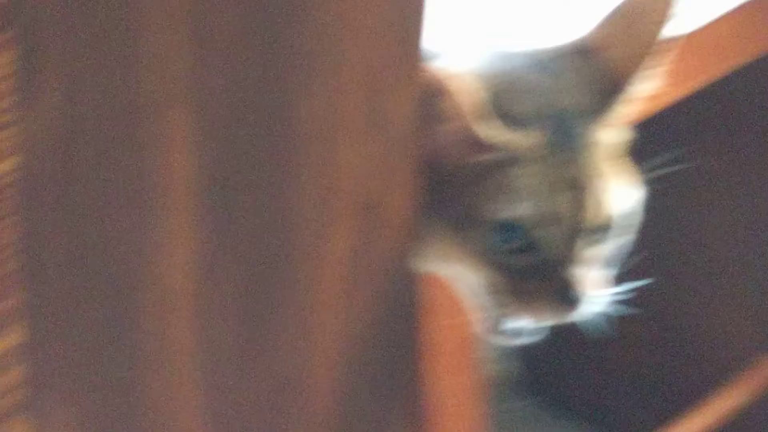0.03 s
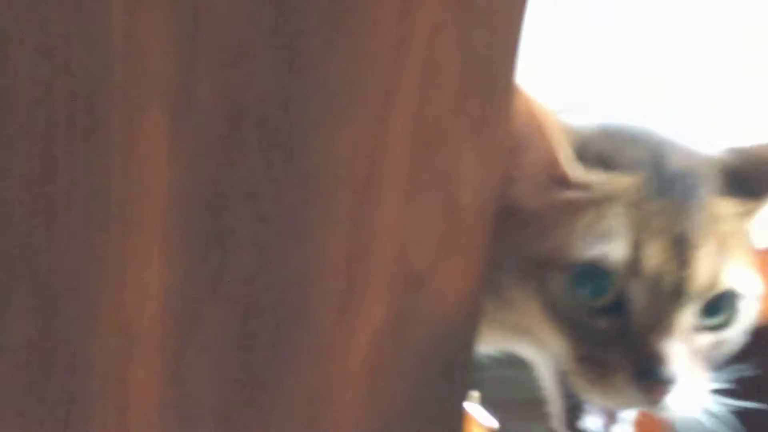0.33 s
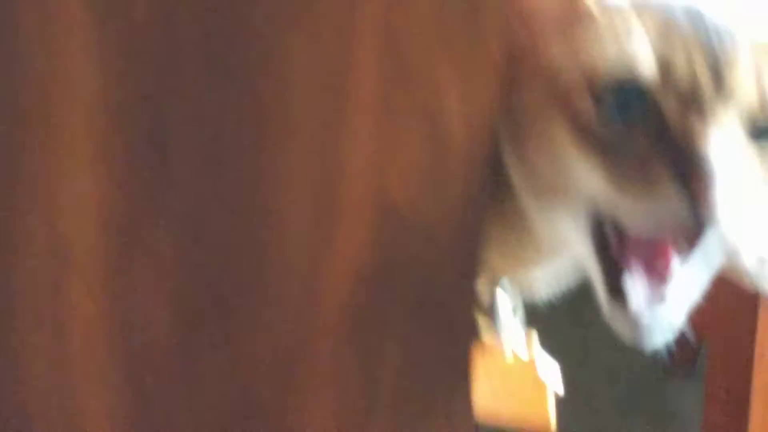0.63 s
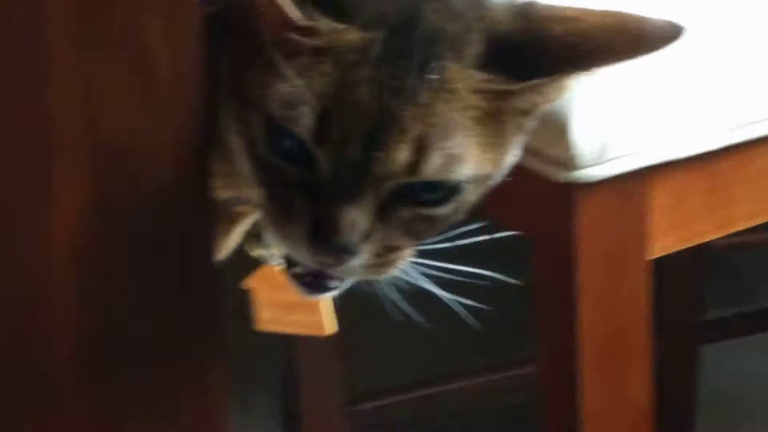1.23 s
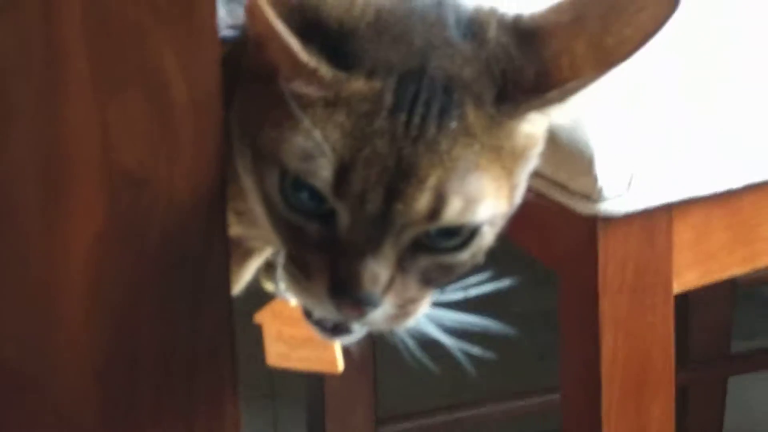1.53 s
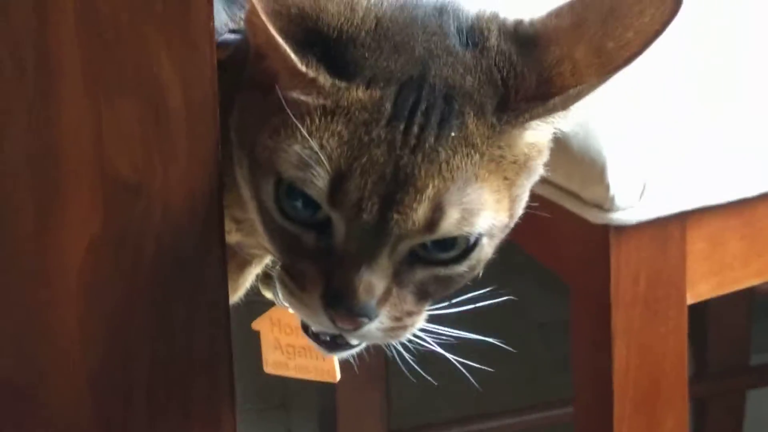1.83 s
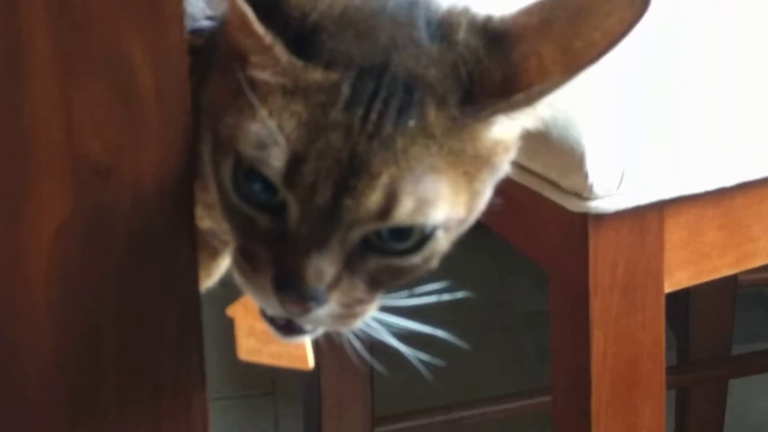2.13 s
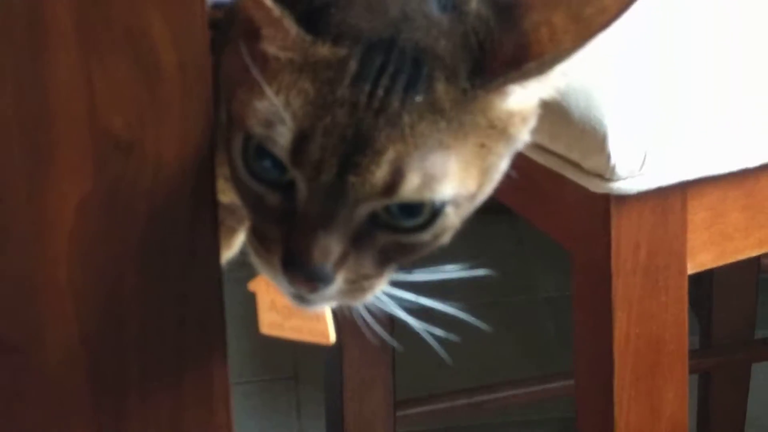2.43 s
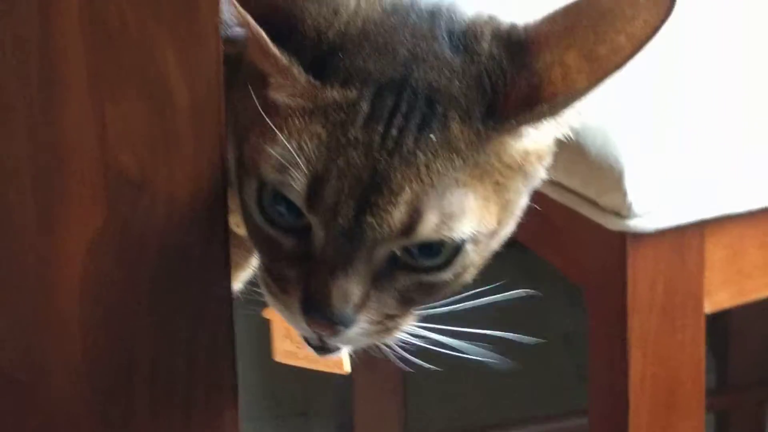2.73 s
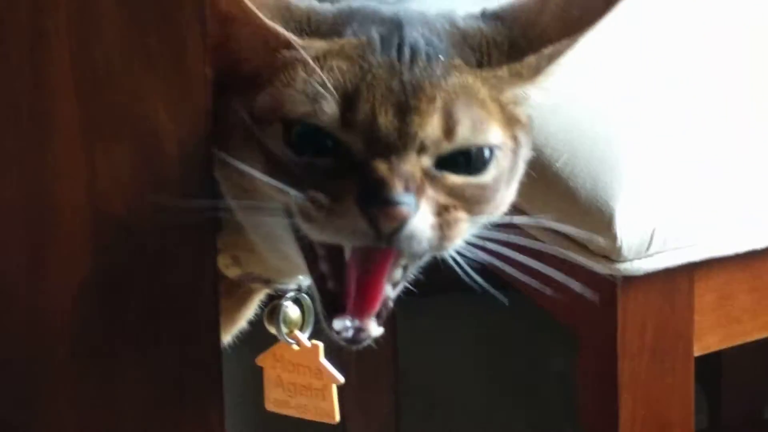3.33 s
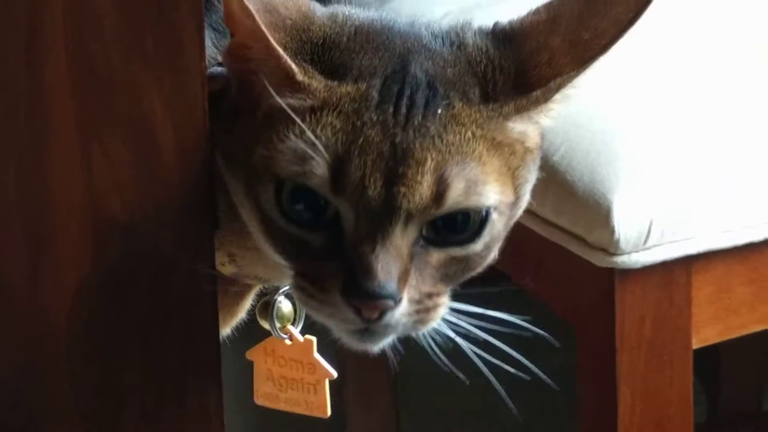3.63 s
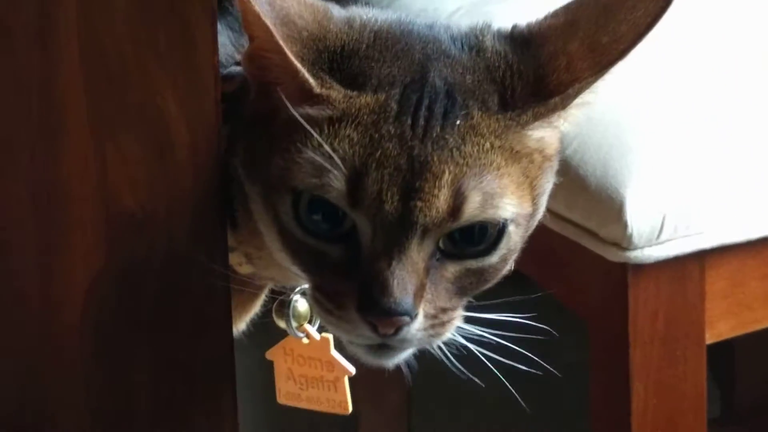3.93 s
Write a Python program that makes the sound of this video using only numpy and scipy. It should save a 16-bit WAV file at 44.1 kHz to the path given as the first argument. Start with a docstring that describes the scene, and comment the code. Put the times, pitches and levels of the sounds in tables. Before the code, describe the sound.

A cat's long growling yowl breaks into spitting and a hiss, close by indoors.

```python
"""A small room, the microphone close to a cat. Its voice holds one long growling yowl, shaped by a mouth
that opens and narrows; midway something bumps softly on wood. The yowl breaks off into wet, crackling
spits of air. The collar tag jingles and fur brushes the furniture, with two more faint bumps; then air
rushes through the open mouth in a hiss. The tag jingles again and the cat spits once more.
The microphone rings near 8 kHz, which sharpens every sound."""
import sys
import numpy as np
from scipy import signal
from scipy.fft import rfft, irfft, next_fast_len
from scipy.io import wavfile
from scipy.ndimage import map_coordinates

SR = 44100
rng = np.random.default_rng(int(sys.argv[2]) if len(sys.argv) > 2 else 0)


def generate_wav(sig):
    """Save sig (samples, or channels by samples) to the path in sys.argv[1] as 16-bit PCM at SR."""
    pcm = np.round(np.clip(np.atleast_2d(sig).T, -1, 1) * 32767).astype(np.int16)
    wavfile.write(sys.argv[1], SR, pcm)


N = 176400
YOWL_START_S, YOWL_END_S = 0.1142, 2.275
# spectrum of a sharp click, from the mouth or the tag: frequency_hz, level_db
CLICK_SPECTRUM = [(500, -16.5), (4000, -13.5), (6500, -4), (8200, 6), (10000, -10.5), (12000, -13),
                  (16000, -21)]


def amp(db):
    """Decibels to gain."""
    return 10 ** (np.asarray(db) / 20)


def unit(x):
    """Scale to rms 1."""
    return x / np.sqrt(np.mean(x ** 2) + 1e-20)


def along(points, hz):
    """Interpolate (frequency_hz, value) points on a log frequency axis."""
    f, v = np.transpose(points)
    return np.interp(np.log(hz + 1), np.log(f + 1), v)


def clock():
    """Time of each sample in seconds."""
    return np.arange(N) / SR


def curves(rows):
    """One value per sample for each column after the time."""
    times, *columns = np.transpose(rows)
    return [np.interp(clock(), times, column) for column in columns]


def wobble(rate):
    """A smooth random curve, rate knots a second."""
    return map_coordinates(rng.standard_normal(N // 8), [clock() * rate], mode="mirror")


def filtered(x, response):
    """Pass x through a complex response of frequency."""
    size = next_fast_len(N + SR // 2)
    return irfft(rfft(x, size) * response(np.fft.rfftfreq(size, 1 / SR)), size)[:N]


def noise(spectrum, tilt_db=0):
    """Coloured noise of rms 1, tilted by tilt_db per octave."""
    white = rng.standard_normal(N)
    return unit(filtered(white, lambda f: amp(along(spectrum, f) + tilt_db * np.log2(f + 1))))


def resonance(f, centre_hz, width_hz):
    """One resonance with gain 1 at its centre."""
    return 1j * f * width_hz / (centre_hz ** 2 - f ** 2 + 1j * f * width_hz)


def burst(start_s, attack_s, t60_s, hold_s=0):
    """Envelope with attack, hold and exponential release."""
    t = np.maximum(clock() - start_s, 0)
    return (1 - np.exp(-t / attack_s)) * 1000 ** (-np.maximum(t - hold_s, 0) / t60_s)


def room_tone():
    """Quiet, bass-heavy noise that comes up just after the yowl begins and stays."""
    # background spectrum: frequency_hz, level_db
    spectrum = [(20, -26), (35, -8), (55, 3.5), (110, -2), (200, -7.5), (400, -8), (1000, -11), (2000, -13),
                (5000, -14), (8200, -11.5), (11000, -19), (16000, -21)]
    fade_in = burst(0.2, attack_s=0.052, t60_s=1, hold_s=N / SR) + 0.073 * (clock() > YOWL_START_S)
    return amp(-56) * noise(spectrum) * fade_in


def room(x, reflections=8, reflections_db=-14.5, tail_db=-10):
    """Early reflections from the furniture, then a short tail."""
    # reverberation time: frequency_hz, t60_s
    decay = [(100, 0.14), (1000, 0.52), (4000, 0.56), (8000, 0.77), (15000, 0.13)]
    hz, t, bands = signal.stft(rng.standard_normal(SR * 3 // 4), SR, nperseg=256)
    tail = signal.istft(bands * amp(-60 * t / along(decay, hz)[:, None]), SR, nperseg=256)[1]
    response = amp(tail_db) * tail / np.linalg.norm(tail)
    delays_s = rng.uniform(.002, .025, reflections)
    response[(delays_s * SR).astype(int)] += amp(reflections_db) / np.sqrt(reflections)
    return signal.fftconvolve(x, response)[:N]


def fur_rustle(grain_db=1.5):
    """The cat shifts its head, brushing faintly against the wood."""
    # brushes of fur on the furniture: start_s, level_db, rise_s, t60_s
    brushes = [(2.499, -48, 0.011, 0.9), (2.74, -52.5, 0.018, 0.89), (3.76, -50, 0.068, 1.0)]
    # spectrum of the brushing: frequency_hz, level_db
    spectrum = [(60, -11), (200, -10), (500, -2), (950, -1), (1600, -9), (4000, -10.5), (16000, -23)]
    friction = unit(noise(spectrum) * amp(grain_db * wobble(120)))
    return friction * sum(amp(db) * burst(start, rise, t60) for start, db, rise, t60 in brushes)


def bumps(attack_s=0.0022):
    """Dull thuds against wood, each a dying burst of low noise."""
    # soft impacts: start_s, level_db, t60_s, tilt_db_per_octave
    thuds = [(1.143, -28, 0.21, -2), (1.184, -34, 0.46, -0.5), (1.24, -25, 0.23, 1),
             (1.321, -28.5, 0.72, -9), (2.688, -40.5, 0.075, 2.5), (2.734, -41, 0.3, -6.5)]
    # spectrum of a thud: frequency_hz, level_db
    spectrum = [(25, -20), (50, 0.5), (110, -7), (160, -7), (220, -3.5), (310, -15.5), (400, -10.5),
                (600, -20), (1200, -28), (3000, -30), (16000, -79)]
    return sum(amp(db) * noise(spectrum, tilt) * burst(start, attack_s, t60)
               for start, db, t60, tilt in thuds)


def collar_tag(contact_width_hz=270, click_db=-11.5, wander_rad=0.33):
    """The collar tag strikes its ring; each contact favours other modes, and the fur damps them."""
    # contacts: start_s, level_db, most_excited_hz, share_of_free_t60
    strikes = [(2.529, -27.5, 9130, 0.9), (2.612, -30, 8200, 0.3), (2.618, -36, 8400, 0.55),
               (2.66, -41, 7700, 0.29), (2.679, -36, 8800, 1), (3.51, -29, 12370, 0.37),
               (3.726, -37.5, 7940, 1), (3.754, -33, 8040, 0.7), (3.9175, -30.5, 7650, 0.28)]
    # modes of the tag: frequency_hz, level_db, free_t60_s
    modes = [(8010, -8, 0.078), (8300, 0.5, 0.095), (9050, -8.5, 0.35), (9860, -6, 0.16),
             (11400, 0.5, 0.15), (12060, -1, .16), (12350, -2, 0.11), (13900, -15, 0.13)]
    out, click = np.zeros(N), noise(CLICK_SPECTRUM)
    t = clock()[:SR // 2]
    attack = 1 - np.exp(-t / 0.00049)
    for start, db, contact_hz, t60_share in strikes:
        for hz, mode_db, free_t60 in modes:
            excitation = 1 / np.hypot(1, (hz - contact_hz) / contact_width_hz)
            wander = wander_rad * np.interp(t, np.linspace(0, .5, 100), rng.standard_normal(100))
            tone = np.sin(2 * np.pi * (hz * t + rng.random()) + wander)
            envelope = attack * amp(-60 * t / (t60_share * free_t60))
            span = out[int(start * SR):][:len(t)]
            span += (amp(db + mode_db) * excitation * tone * envelope)[:len(span)]
        out += amp(db + click_db) * click * burst(start, attack_s=0.00092, t60_s=0.056)
    return out


def hiss():
    """Air rushes through the wide-open mouth, fluttering slightly."""
    # swell of the breath: time_s, level_db
    swell = [(2.8, -61), (2.9, -52), (2.98, -41.5), (3.12, -37.5), (3.3, -36), (3.44, -37), (3.47, -45),
             (3.5, -82), (3.54, -119)]
    # spectrum of air in the open mouth: frequency_hz, level_db
    spectrum = [(100, -20), (330, -21), (480, -10.5), (700, -8), (920, -5), (1100, 3), (1230, -6.5),
                (1400, -4.5), (1650, -5), (2000, -10), (2400, -9), (3200, -11), (4700, -16), (6500, -11.5),
                (8200, -7), (10000, -13.5), (12000, -22), (16000, -25.5)]
    level_db, = curves(swell)
    flutter_db = 0.25 * wobble(28) + 0.74 * wobble(400)
    return amp(level_db + flutter_db) * noise(spectrum) * (clock() > swell[0][0])


def spits(grain_db=2):
    """Sudden, grainy blasts of air with wet clicks in them."""
    # blasts of air: start_s, level_db, hold_s, fall_db_per_s, tilt_db_per_octave
    blasts = [(2.188, -28.5, .005, 897, -5), (2.211, -37.5, 0.081, 237, -0.5),
              (2.335, -33, 0.041, 162, 15.5), (3.9543, -22, 0.0058, 900, 1), (3.965, -30, 0.019, 200, 0.5)]
    # spectrum of a blast: frequency_hz, level_db
    spectrum = [(100, -29), (400, -7.5), (950, 0), (1300, -0.5), (2400, 3), (3800, -1.5), (5500, -5),
                (8000, -11), (11000, -16.5), (16000, -45.5)]
    # wet clicks: start_s, level_db
    clicks = [(2.207, -22), (2.2116, -34), (2.2162, -13), (2.232, -28), (2.244, -27.5), (2.268, -26.5),
              (2.297, -27), (2.3375, -18), (2.3394, -14.5), (2.3446, -17.5), (2.361, -19.5), (3.986, -31)]
    air = np.zeros(N)
    for start, db, hold, fall, tilt in blasts:
        blast = unit(noise(spectrum, tilt) * amp(grain_db * wobble(500)))
        air += amp(db) * blast * burst(start, attack_s=0.00075, t60_s=60 / fall, hold_s=hold)
    crackle = sum(amp(db) * burst(start, attack_s=0.00036, t60_s=0.017) for start, db in clicks)
    return air + noise(CLICK_SPECTRUM) * crackle


def yowl(voice_db=-52.5, lower_db=17, upper_db=26.5, third_db=7.5):
    """Clean harmonics through the moving mouth resonances, with a puff of air each cycle."""
    # pitch of the voice: time_s, pitch_hz
    melody = [(.115, 388.7), (.25, 384.9), (.37, 386), (.48, 392.5), (.56, 397.8), (.66, 402.4),
              (.75, 408.2), (.83, 421.6), (.9, 414.3), (1.0, 420.8), (1.04, 428), (1.12, 415.7),
              (1.29, 423.8), (1.42, 413), (1.5, 411), (1.77, 392.7), (1.89, 386.4), (2.03, 389.2),
              (2.3, 389.5)]
    # mouth resonances and the push behind the voice: time_s, lower_hz, upper_hz, third_hz, effort_db
    mouth_shapes = [(0.115, 1090, 1760, 3540, -23.5), (0.17, 1100, 1713.0, 3960, -12.5),
                    (0.26, 1110, 1910, 3760, -6.5), (0.35, 1140, 2166.0, 3610.0, -1.5),
                    (0.44, 1360, 2090, 3460, 1.0), (0.56, 1370, 2217, 3600, 2.5),
                    (0.72, 1480, 2296, 3930, 2.5), (0.8, 2050, 2360, 4430, 1.5),
                    (0.98, 2122, 2407, 4130, 2.0), (1.15, 2010, 2442, 4536.0, 1),
                    (1.33, 1950, 2340, 4350, 3), (1.47, 1673, 2028, 3780, 1.5),
                    (1.62, 1345, 1980, 4200, -0.5), (1.81, 1270, 1880, 3870, 0),
                    (1.89, 1290, 2123, 4160, -1.0), (2.02, 1300, 1914, 3830, -1.0),
                    (2.19, 1300, 2095, 4020, -4.5)]
    # spectrum of the voice's pulses: frequency_hz, level_db
    larynx = [(390.0, 1.5), (800.0, 9.5), (1200.0, 2.5), (1600.0, -1), (2200.0, 1.5), (3000.0, 0),
              (3800.0, -6), (4800.0, -7), (6200.0, 2), (7000.0, 4), (7700.0, 6.5), (8600.0, -5),
              (10000.0, -11), (11000.0, -36)]
    # treble shelf on the voice: time_s, gain_db
    treble = [(0.12, -0.5), (0.35, 0), (0.55, -2), (0.8, 0), (1.05, -5.5), (1.25, -7.0), (1.45, -3),
              (1.7, 1.5), (2.0, 2), (2.19, 5)]
    # brief dips of the piercing upper resonance: centre_s, depth_db, half_length_s
    dips = [(0.3, 10, .015), (0.381, 4, 0.0086), (0.645, 4.5, 0.017), (.73, 8.5, 0.029),
            (1.037, 5.5, 0.017), (1.874, 18, 0.018), (1.928, 8, 0.0096)]
    # air in the yowl: time_s, level_db
    breath = [(.115, -67), (.3, -63), (.42, -46), (.52, -46), (.6, -54), (.8, -47), (1.1, -56),
              (1.4, -53.5), (1.53, -46), (1.7, -57), (2.121, -47), (2.3, -45)]
    # spectrum of that air: frequency_hz, level_db
    breath_spectrum = [(200, -42), (800, -7), (2200, -2), (3500, 2.5), (5000, -2), (8000, 5), (9500, -5),
                       (11000, -13.5), (16000, -18)]
    (pitch_hz,), (treble_db,), (breath_db,) = map(curves, (melody, treble, breath))
    lower_hz, upper_hz, third_hz, effort_db = curves(mouth_shapes)
    pitch_hz *= 1 + 0.00242 * wobble(45) + 0.002 * wobble(350)  # slow and fast jitter
    phase = 2 * np.pi * np.cumsum(pitch_hz) / SR
    dip_db = sum(abs(db) * np.exp(-((clock() - centre) / half) ** 2) for centre, db, half in dips)
    voice = np.zeros(N)
    for harmonic in range(1, 33):
        hz = harmonic * pitch_hz
        lower = resonance(hz, lower_hz, width_hz=550)
        upper = resonance(hz, upper_hz, width_hz=372)
        third = resonance(hz, third_hz, width_hz=1010)
        peaks = (lower_db, lower), (upper_db - dip_db, upper), (third_db, third)
        mouth = 1 + sum(amp(db) * abs(peak) ** 3 for db, peak in peaks)  # cubing narrows each peak
        flutter_db = 2 * np.minimum(hz / 2000, 1.5) * wobble(22)  # high harmonics flicker more
        shelf_db = treble_db * np.clip(hz / 5030 - .5, 0, 1)
        source = amp(along(larynx, hz) + shelf_db + flutter_db)
        voice += mouth * source * np.cos(harmonic * phase + np.angle(lower * upper))
    puffs = unit(noise(breath_spectrum) * (1 + .5 * np.cos(phase)))
    envelope = burst(YOWL_START_S, attack_s=0.00084, t60_s=0.033, hold_s=YOWL_END_S - YOWL_START_S)
    return envelope * (amp(voice_db + effort_db) * voice + amp(breath_db) * puffs)


def scene():
    """The cat and the bumps in the room, over quiet room tone."""
    voice = yowl()
    noises = spits() + hiss() + collar_tag() + bumps() + fur_rustle()
    background = room_tone()
    # the yowl gets slightly less reverb, keeping its overtones steady
    reverb = room(amp(-2.5) * voice + noises)
    return (voice + noises + reverb + background)[None]


def record(dry, low_cut_hz=40, top_hz=16100):
    """The microphone's bass cut, treble resonance and band limit."""
    def microphone(f):
        bass_cut = 1 - 1 / (1 + (f / low_cut_hz) ** 8)
        ring = 1 + amp(5.5) * resonance(f, centre_hz=8090, width_hz=1070)
        return bass_cut * ring * (f < top_hz)
    return filtered(dry[0], microphone)[None]


dry = scene()
out = record(dry)
generate_wav(out)
```